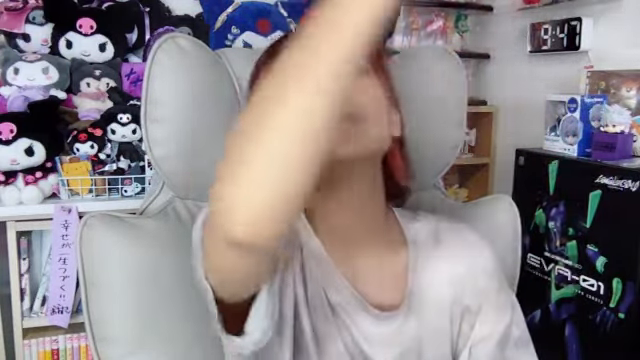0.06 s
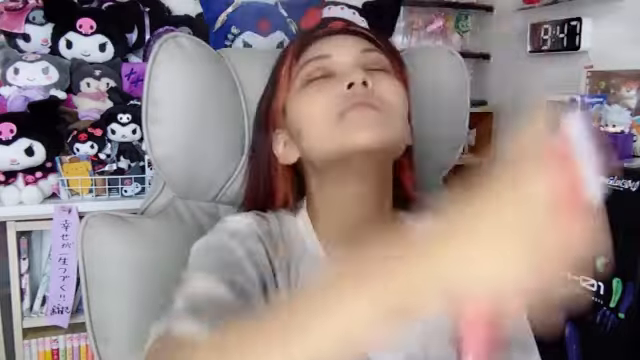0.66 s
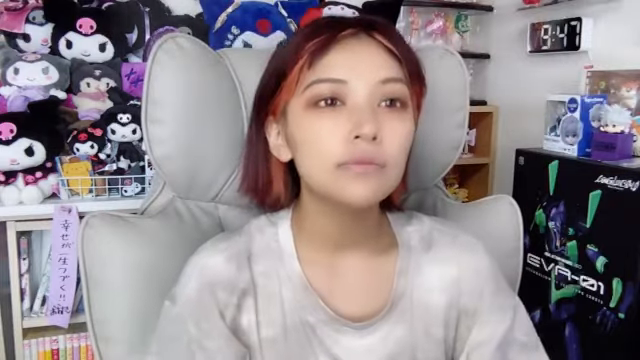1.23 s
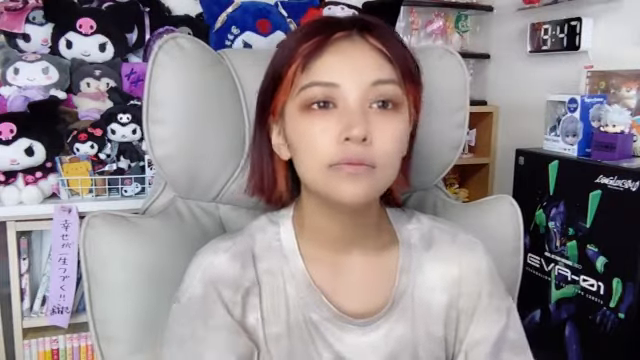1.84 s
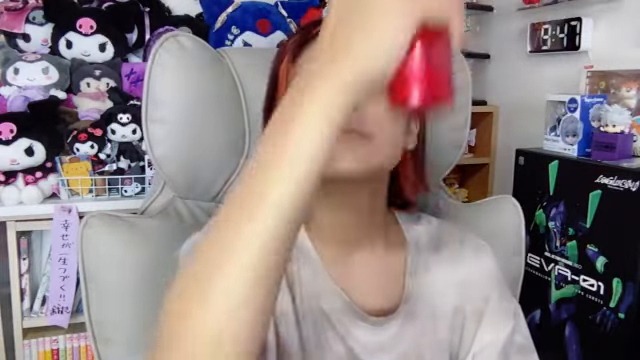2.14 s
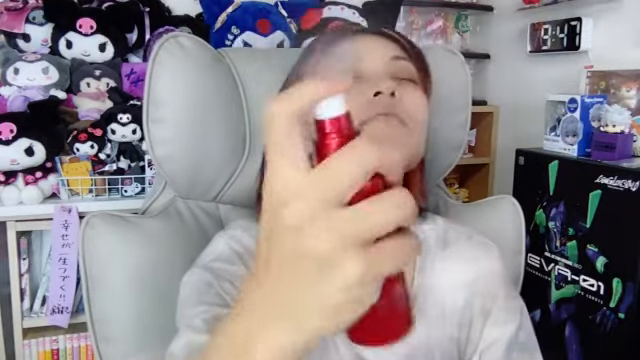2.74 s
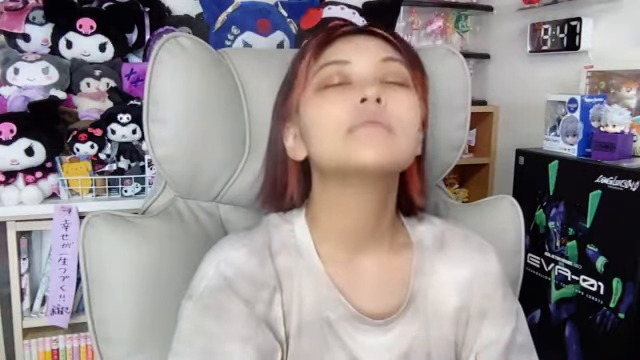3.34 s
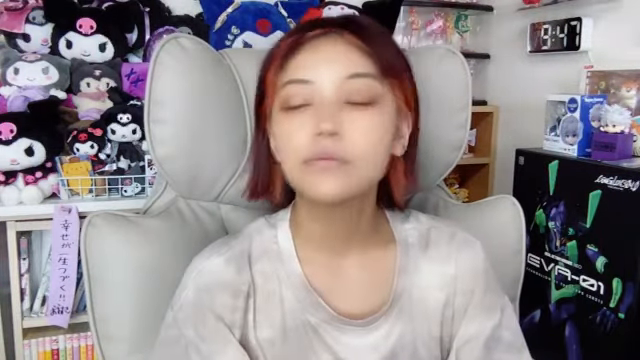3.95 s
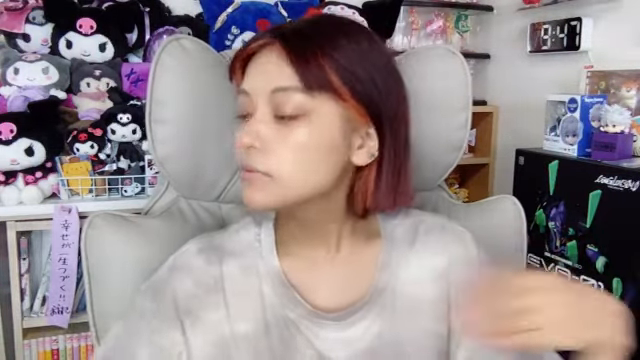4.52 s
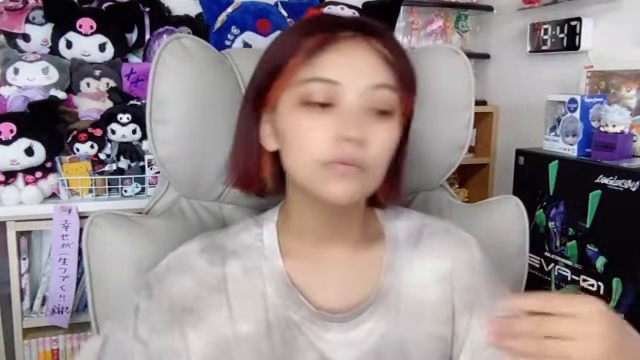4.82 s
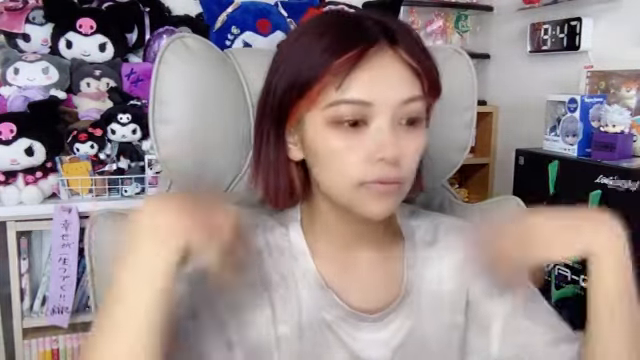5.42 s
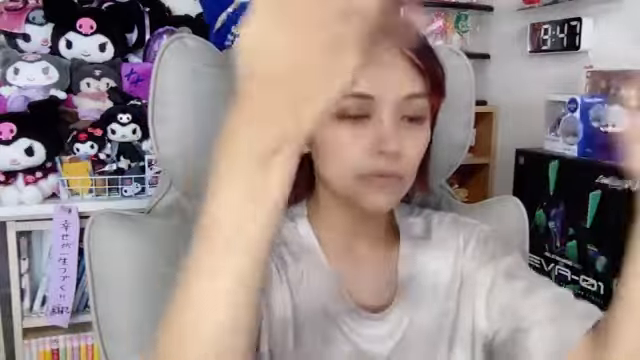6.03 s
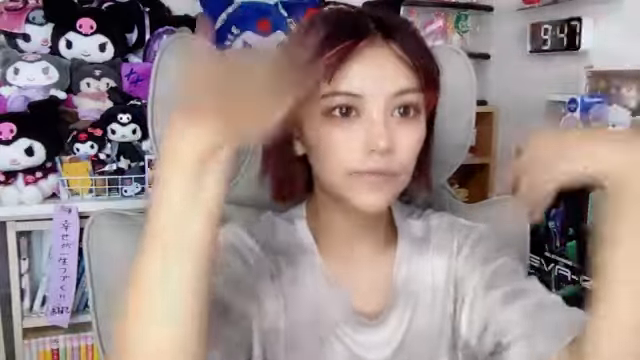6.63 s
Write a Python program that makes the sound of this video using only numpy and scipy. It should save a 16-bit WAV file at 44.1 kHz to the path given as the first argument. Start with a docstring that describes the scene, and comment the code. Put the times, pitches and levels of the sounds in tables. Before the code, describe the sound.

A small pump bottle sprays short puffs of mist, its plastic cap pops and snaps, then it clatters onto a desk.

```python
"""A furnished room, at a desk where a computer fan hums. Someone mists their face with a small pump bottle:
three quick strokes, later two slow ones, each a knock of the pump head and a hiss of turbulent flow.
In between, the plastic cap pops off, ringing its shell and the air inside. Afterwards it is pushed back
on with a squeak and snaps shut, and the bottle clatters onto the desk, exciting the desk's modes."""
import sys
import numpy as np
from scipy import signal
from scipy.fft import rfft, irfft
from scipy.io import wavfile
from scipy.ndimage import uniform_filter1d

SR = 44100
rng = np.random.default_rng(int(sys.argv[2]) if len(sys.argv) > 2 else 0)


def file_out(sig):
    """Save sig as 16-bit WAV at sys.argv[1]."""
    # one column per channel
    cols = np.atleast_2d(sig).T
    # limit, then scale
    lim = np.clip(cols, -1, 1)
    pcm = np.round(lim * 32767).astype(np.int16)
    wavfile.write(sys.argv[1], SR, pcm)


N = 294147
RING_S = np.arange(SR // 2) / SR  # time axis of a single event

# Pump strokes. Each row: start, valve delay and spray length in seconds, then in dB the mist level,
# the knock level, the snap relative to the knock and the change per rebound.
STROKES = [(.001, 0.019, 0.11, -52.5, -42.5, -8, -5), (.214, .026, 0.1, -52.5, -44.5, -3.5, 0),
           (0.4318, .034, .1, -51.5, -45, 0.5, 0.5), (2.11, .001, .14, -49, -58, -3, -12),
           (2.747, .001, .13, -46, -46, -16, -12)]


def undb(db):
    """Decibels to amplitude ratio."""
    return 10 ** (np.asarray(db) / 20)


def unit(x):
    """Normalisation to rms 1."""
    return x / np.sqrt(np.mean(x ** 2))


def read(points, hz):
    """Interpolation of (Hz, value) points on a log-frequency axis."""
    f, value = np.transpose(points)
    return np.interp(np.log(np.maximum(hz, 1)), np.log(f), value)


def add(track, s, sound):
    """Superposition of a sound on the track, starting at s seconds."""
    start = max(int(s * SR), 0)
    track[start:start + len(sound)] += sound[:N - start]


def noise(spectrum, size):
    """Spectral shaping of white noise, at rms 1."""
    colour = undb(read(spectrum, np.fft.rfftfreq(size, 1 / SR)))
    return unit(irfft(rfft(rng.standard_normal(size)) * colour, size))


def drift(rate_hz):
    """Slow fluctuation by interpolation between Gaussian values."""
    knots = rng.standard_normal(int(N / SR * rate_hz) + 2)
    return np.interp(np.arange(N) / SR * rate_hz, np.arange(len(knots)), knots)


def fade(t60):
    """Exponential decay of a free vibration, by 60 dB in t60 seconds."""
    return np.exp(-np.log(1000) * RING_S / t60)


def ring(modes, pitch=1):
    """Impulse response of damped (Hz, dB, t60) modes, alternating in sign."""
    return sum((-1) ** k * undb(db) * fade(t60) * np.sin(2 * np.pi * hz * pitch * RING_S)
               for k, (hz, db, t60) in enumerate(modes))


def vary(modes, scatter_db=2, detune=0.0306):
    """Striking point and grip change the weight and frequency of each mode, here at random."""
    chance = rng.standard_normal((len(modes), 2))
    return [(hz * (1 + detune * a), db + scatter_db * b, t60)
            for (hz, db, t60), (a, b) in zip(modes, chance)]


def burst(spectrum, t60):
    """Modal overlap: the dense, damped modes of a contact merge into noise of the given (Hz, dB) colour."""
    size, full_size = 16384, len(RING_S)
    decay = fade(t60)[:size]
    sound = rng.standard_normal(size) * decay
    for _ in range(3):  # flatten the spectrum so that no mode stands out
        modes = rfft(sound)
        sound = irfft(modes / np.abs(modes)) * fade(10 * t60)[:size]
    colour = undb(read(spectrum, np.fft.rfftfreq(full_size, 1 / SR)))
    sound = irfft(rfft(sound, full_size) * colour, full_size) * (RING_S < size / SR)
    return sound * np.sqrt(np.sum(decay ** 2) / np.sum(sound ** 2))


def radiate(x, hz, order):
    """Radiation efficiency falls at wavelengths much longer than the source."""
    return signal.sosfilt(signal.butter(order, hz, "high", fs=SR, output="sos"), x)


def in_room(sound, early_db, late_db, first_s=0.002, build_s=0.00348):
    """Reverberation: early reflections off desk and screen and a diffuse tail follow the direct sound."""
    # Room decay. Each row: frequency in Hz, t60 in seconds.
    room_t60 = [(100, 0.334), (500, 0.39), (2500, 0.38), (5000, 0.2985), (8000, 0.49), (15000, 0.33)]
    # Colour left by the furnishings. Each row: frequency in Hz, relative level in dB.
    room_colour = [(150, -1.5), (1000, -1), (2800, 1.5), (5500, 0), (8000, -1.5), (15000, -3)]
    size = len(RING_S)
    hz = np.fft.rfftfreq(size, 1 / SR)
    white = rfft(rng.standard_normal(size))
    centres, t60s = np.transpose(room_t60)
    bands = [irfft(white * read(np.c_[centres, share], hz), size) for share in np.eye(len(centres))]
    late = sum(fade(t60) * band for t60, band in zip(t60s, bands))
    early = fade(t60=0.16) * rng.standard_normal(size)
    spectrum = rfft(undb(early_db) * unit(early) + undb(late_db) * unit(late), 2 * size)
    ripple = np.sqrt(uniform_filter1d(np.abs(spectrum) ** 2, size=70))
    colour = undb(read(room_colour, np.fft.rfftfreq(2 * size, 1 / SR)))
    echoes = irfft(spectrum * colour / ripple)[:size]  # clutter scatters all bands evenly
    onset = np.clip((RING_S - first_s) / build_s, 0, 1)
    response = unit(echoes * onset) / np.sqrt(size)
    return sound + np.hypot(undb(early_db), undb(late_db)) * signal.fftconvolve(sound, response)[:N]


def fan(air_db=-62, drone_hz=76, wander_rad=0.35):
    """Broadband flow noise under phase-modulated hum tones; a low drone swells past halfway."""
    # Rumble and thin hiss. Each row: frequency in Hz, relative spectral density in dB.
    air_spectrum = [(15, -43.5), (25, -15.5), (43, -5), (59, -7), (82, -1.5), (164, -6.5), (267, -21),
                    (289, -14), (359, -24), (399, -13), (433, -24.5), (509, -17.5), (848, -25.5),
                    (1080, -27), (15500, -43)]
    # Fan tones. Each row: frequency in Hz, level in dB.
    hum_tones = [(101, -67.5), (300, -75.5), (400, -78.5)]
    # Swell of the drone. Each row: time in seconds, level in dB.
    drone_swell = [(3.4, -70), (4.1, -61), (5.2, -64.5)]
    t = np.arange(N) / SR
    drone_db = np.interp(t, *np.transpose(drone_swell))
    hum = sum(undb(db) * np.sqrt(2) * np.sin(2 * np.pi * hz * t + wander_rad * drift(rate_hz=13))
              for hz, db in [*hum_tones, (drone_hz, drone_db)])
    return undb(air_db) * noise(air_spectrum, N) + hum


def bumps(rub_db=-7, ring_db=-3, gap_s=0.024, rebound_db=-6.5):
    """Inelastic impact: padded knocks rebound ever more weakly, each a low mode with a dull rub."""
    # Bumps on chair and desk, and things settling. Each row: start in seconds, level in dB, pitch in Hz.
    knocks = [(1.185, -50, 425), (1.721, -53, 203), (2.078, -55.5, 278), (3.809, -45.5, 242),
              (4.614, -48, 257), (4.887, -42, 254), (4.99, -43, 663), (5.772, -47, 273)]
    out = np.zeros(N)
    for s, db, hz in knocks:
        for k in range(3):
            rub = burst([(hz / 2, -10), (hz, 0), (2 * hz, -15), (6 * hz, -28), (40 * hz, -55)], t60=0.1)
            knock = ring(vary([(hz, ring_db, 0.06)], detune=0.099))
            add(out, s + k * gap_s, undb(db + k * rebound_db) * (knock + undb(rub_db) * rub))
    return out


def fingers(tap_t60=0.013, slide_stop_s=0.012, touch_db=6):
    """Impact and friction: fingertips ring the plastic, and one brief slide makes a scraping noise."""
    # Taps. Each row: start in seconds, level in dB, ring frequency in Hz, relative tick level in dB.
    taps = [(.931, -61, 2420, 9.5), (1.2147, -41.5, 2620, -8.5), (1.302, -48.5, 2870, -19),
            (1.79, -55.5, 2700, -2.5), (2.3023, -64, 3620, 9.5), (2.749, -40.5, 2700, -10),
            (2.988, -59, 2840, -19), (3.7755, -40.5, 2010, -5)]
    # The slide: start and length in seconds, level in dB.
    slide = (1.719, .085, -70)
    # Friction noise. Each row: frequency in Hz, relative spectral density in dB.
    slide_spectrum = [(500, -1), (1700, -5), (2230, 4.5), (2600, -12), (4100, -9), (5000, -19),
                      (15000, -27)]
    out = np.zeros(N)
    for s, db, hz, tick_db in taps:
        tick = burst([(hz / 6, -14), (hz, 0), (hz * 6, -16)], t60=0.015)
        add(out, s, undb(db) * (ring([(hz, 0, tap_t60)]) + undb(tick_db) * tick))
    s, length, db = slide
    pressure = np.exp(-np.maximum(RING_S - length, 0) / slide_stop_s) + undb(touch_db) * fade(tap_t60)
    add(out, s, undb(db) * pressure * noise(slide_spectrum, len(RING_S)))
    return out


def clatter(base_lag_s=0.012, rim_db=-2, rim_rattle_db=6, thud_db=-11, thud_hz=150, thud_t60=0.065):
    """Impact excitation: the bottle's rim, then its base, rings the desk and rattles the things on it."""
    # The bottle lands and rocks. Each row: start in seconds, base level in dB, relative rattle in dB.
    landings = [(4.7403, -29, 4), (4.7455, -20.5, -4), (4.7607, -28.5, -10), (4.7988, -28, -1),
                (4.836, -42, 5.5), (4.886, -38, -1)]
    # Desk modes. Each row: frequency in Hz, relative level in dB, t60 in seconds.
    desk_modes = [(168.3, -11, 0.12), (244, -18, 0.15), (370.7, -4.5, 0.079), (490, -2.5, 0.094),
                  (567, -4, 0.097), (768, -6.5, 0.12), (1023, -14, 0.15), (1256, -16, 0.046),
                  (1577, -15.5, 0.11), (2000, -14.5, 0.11), (2625, -26, 0.39)]
    # Rattle. Each row: frequency in Hz, relative spectral density in dB.
    rattle_spectrum = [(25, -25), (60, -6), (150, 5.5), (500, 4.5), (1200, 4), (2500, -2.5), (5300, -5.5),
                       (6300, -10), (11000, -12), (16000, -19)]

    def blow(db, rattle_db):
        return undb(db) * (ring(vary(desk_modes)) + undb(rattle_db) * burst(rattle_spectrum, t60=0.066))

    out = np.zeros(N)
    for s, db, rattle_db in landings:
        add(out, s, blow(db + rim_db, rattle_db + rim_rattle_db))
        thud = ring([(thud_hz, db + thud_db, thud_t60)])
        add(out, s + base_lag_s, blow(db, rattle_db) + thud)
    return radiate(out, hz=119, order=2)


def cap_pop(crack_db=-8, swell_s=0.0036):
    """Cavity resonance: the seal cracks open, the shell rings, and the air in the cap swings up after."""
    # The pop, then a light knock in the hand. Each row: start in seconds, shell and air levels in dB,
    # t60 of the hand's damping in seconds.
    pops = [(1.1117, -25, -24.5, .6), (1.185, -52, -30.5, 0.036)]
    # Shell modes of the open cap. Each row: frequency in Hz, relative level in dB, t60 in seconds.
    shell_modes = [(1400, -4, 0.018), (2076, -6.5, 0.033), (2730, -4, 0.0084), (3080, 2, 0.015),
                   (5930, -7, 0.012)]
    # The cavity mode: frequency in Hz, relative level in dB, t60 in seconds.
    air_mode = (1050, 4.1, 0.053)
    # Crack of the seal. Each row: frequency in Hz, relative spectral density in dB.
    crack_spectrum = [(600, -36), (1200, -10), (3200, 4.5), (4200, -6.5), (6200, -9), (7500, -10.5),
                      (11000, -11.5), (16000, -27)]
    out = np.zeros(N)
    air = ring([air_mode]) * (1 - np.exp(-RING_S / swell_s))
    for s, shell_db, air_db, hand_t60 in pops:
        shell = ring(shell_modes) + undb(crack_db) * burst(crack_spectrum, t60=0.028)
        add(out, s, (undb(shell_db) * shell + undb(air_db) * air) * fade(hand_t60))
    return radiate(out, hz=885, order=4)


def cap_squeak(rise_s=0.00089, stop_s=0.001, wall_hz=2290, wall_db=-13):
    """Friction-driven vibration: the cap slides down the neck with a short, sinking tone."""
    # The squeak: start and length in seconds, level in dB, first and last frequency in Hz.
    glide = (3.6195, .0105, -17, 1370, 1250)
    s, length, db, first_hz, last_hz = glide
    phase = 2 * np.pi * np.cumsum(np.interp(RING_S, [0, length], [first_hz, last_hz])) / SR
    grip = np.minimum(RING_S / rise_s, 1) * np.exp(-np.maximum(RING_S - length, 0) / stop_s)
    wall = undb(wall_db) * np.sin(2 * np.pi * wall_hz * RING_S)
    out = np.zeros(N)
    add(out, s, undb(db) * grip * (np.sin(phase) + wall))
    return out


def cap_snap():
    """Impulsive excitation: the cap cracks over its ridges, ringing the shell and the enclosed air."""
    # The cap catches and seats. Each row: start in seconds, shell and air levels in dB, pitch factor,
    # crack level in dB, crack t60 in seconds.
    snaps = [(3.6192, -37.5, -31.5, 1.05, -27, 0.019), (3.6269, -42.5, -41.5, 1.15, -34, 0.066),
             (3.6484, -20, -17.5, 0.98, -22, 0.019), (3.658, -37, -25, 0.99, -22.5, 0.041),
             (3.666, -45.5, -27, 1.2, -39.5, 0.032), (3.677, -48, -35.5, 0.82, -36.5, 0.068),
             (3.807, -21, -29, 0.913, -23.5, 0.025)]
    # Shell and cavity modes. Each row: nominal frequency in Hz, relative level in dB, t60 in seconds.
    shell_modes = [(2273, 0, 0.017), (2943, -3, 0.013), (5513, -5.5, 0.012)]
    air_modes = [(473.4, -17, 0.05), (1090, -3.5, 0.047), (1286, -4.5, 0.021)]
    # Crack at a ridge. Each row: frequency in Hz, relative spectral density in dB.
    crack_spectrum = [(30, -34.5), (120, -16.5), (300, -6), (600, -8), (1000, 2), (2200, 1.5), (3500, -5.5),
                      (7000, -9.5), (12000, -8), (16000, -20.5)]
    out = np.zeros(N)
    for s, shell_db, air_db, pitch, crack_db, t60 in snaps:
        shell = undb(shell_db) * ring(shell_modes, pitch)
        air = undb(air_db) * ring(air_modes, pitch)
        add(out, s, shell + air + undb(crack_db) * burst(crack_spectrum, t60))
    return radiate(out, hz=200, order=2)


def pump(rebound_s=0.0068, duller_db=-2, tick_db=1):
    """Contact chatter: the head knocks and rebounds under the finger; the plunger springs back, ticking."""
    # Head and plunger modes. Each row: frequency in Hz, relative level in dB, t60 in seconds.
    head_modes = [(1144, -13, 0.036), (1425, -13, 0.06), (1960, -12.5, 0.04), (2358, -11.5, 0.1),
                  (2840, -16, 0.039), (6700, -13, .012)]
    plunger_modes = [(9840, 2, 0.011)]
    # Snap of the head. Each row: frequency in Hz, relative spectral density in dB.
    snap_spectrum = [(500, -42), (1300, 7), (3000, -4), (4200, -3.5), (7000, 3), (12000, -3), (16000, -0.5)]
    # Returns of the plunger. Each row: start in seconds, level in dB.
    releases = [(.168, -56), (.387, -54), (0.6144, -54.5), (2.3543, -55.5), (2.9556, -52)]
    out = np.zeros(N)
    for s, _, _, _, db, snap_db, rebound_db in STROKES:
        for k in range(3):
            head = ring(vary(head_modes))
            snap = undb(snap_db + k * duller_db) * burst(snap_spectrum, t60=0.027)
            add(out, s + k * rebound_s, undb(db + k * rebound_db) * (head + snap))
    for s, db in releases:
        tick = burst([(1600, -10), (9900, -6), (16000, -2)], t60=0.015)
        add(out, s, undb(db) * (ring(plunger_modes) + undb(tick_db) * tick))
    return out


def mist(open_s=0.0057, stop_s=0.026):
    """Jet noise follows pump pressure: the valve opens, flow swells, then dies as the piston bottoms out."""
    # Nozzle hiss. Each row: frequency in Hz, relative spectral density in dB.
    hiss_spectrum = [(410, -58), (700, -25), (873, -43), (1050, -7.5), (1390, -8), (1520, -9.5),
                     (2110, -7.5), (2560, -5.5), (3870, -4), (4700, -4), (5220, -2.5), (7220, -1.5),
                     (15500, -1.5)]
    flow = np.zeros(N)
    for s, wait, length, db, *_ in STROKES:
        push = np.interp(RING_S, [0, open_s, 0.59 * length, length], [0, 0.64, 1, 0.71])
        shutoff = np.exp(-np.maximum(RING_S - length, 0) / stop_s)
        add(flow, s + wait, undb(db) * push * shutoff)
    return flow * noise(hiss_spectrum, N)


def scene():
    """Direct-to-reverberant ratio conveys distance: the spray is close, the desk stirs the room more."""
    spray = in_room(mist(), early_db=-16, late_db=-17)
    handling = in_room(pump() + fingers(), early_db=-8, late_db=-15.5)
    pop = in_room(cap_pop(), early_db=-8, late_db=-15.5)
    squeak = in_room(cap_squeak(), early_db=-15, late_db=-21.5)
    snap = in_room(cap_snap(), early_db=-8.5, late_db=-17)
    desk = in_room(clatter() + bumps(), early_db=-3, late_db=-10)
    return (spray + handling + pop + squeak + snap + desk + fan())[None]


def record(dry, low_hz=34, top_hz=15750):
    """Band limiting: filters remove the deepest rumble and cut the top steeply."""
    sound = signal.sosfilt(signal.butter(4, low_hz, "high", fs=SR, output="sos"), dry)
    return signal.sosfilt(signal.ellip(10, 0.1, 70, top_hz, fs=SR, output="sos"), sound)


dry = scene()
out = record(dry)
file_out(out)
```